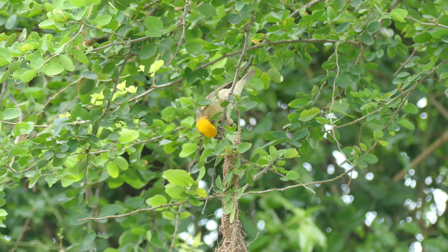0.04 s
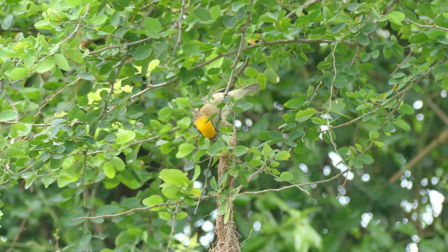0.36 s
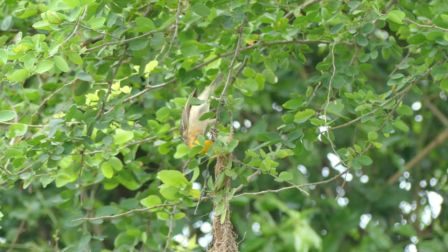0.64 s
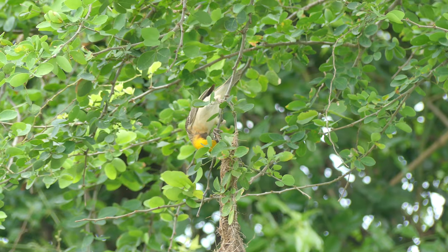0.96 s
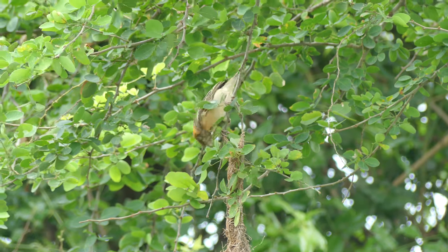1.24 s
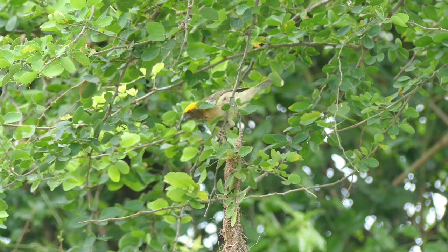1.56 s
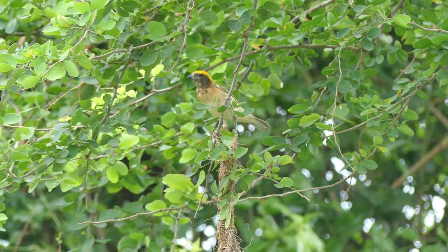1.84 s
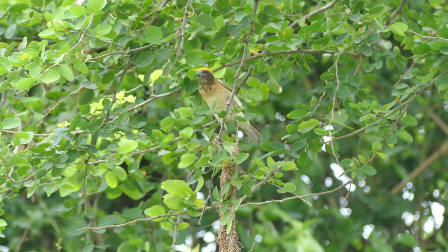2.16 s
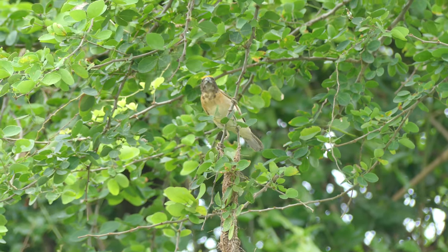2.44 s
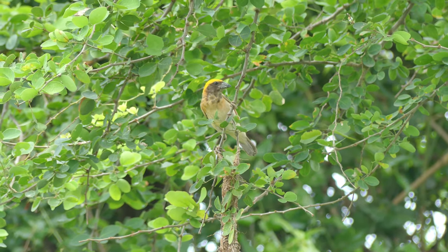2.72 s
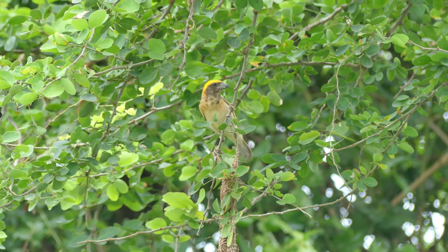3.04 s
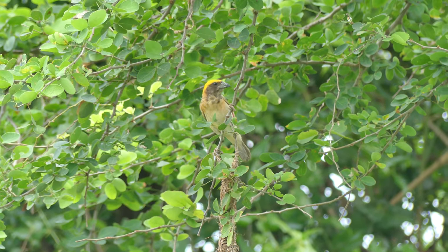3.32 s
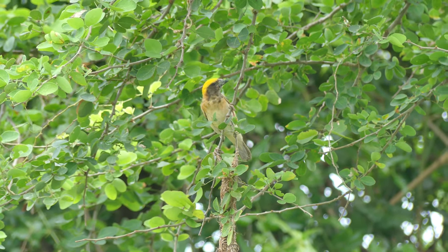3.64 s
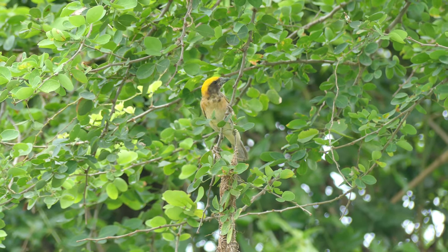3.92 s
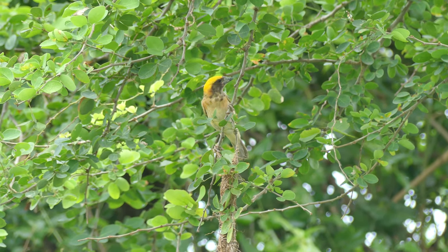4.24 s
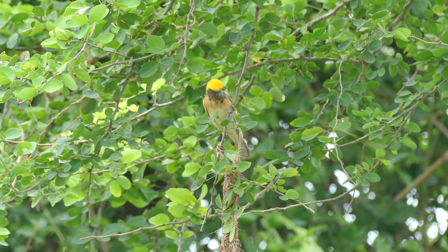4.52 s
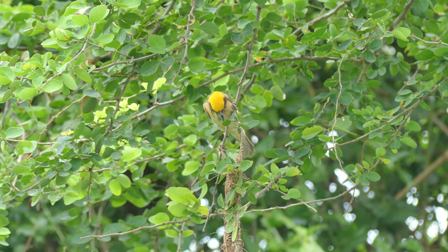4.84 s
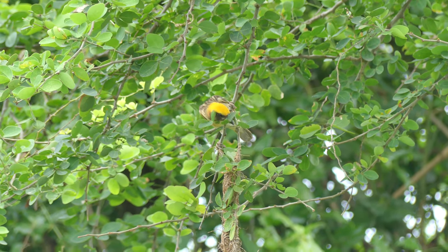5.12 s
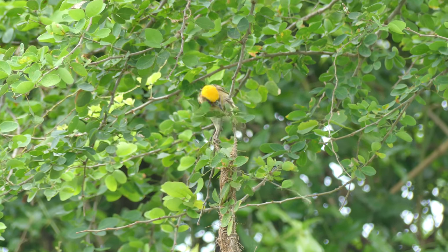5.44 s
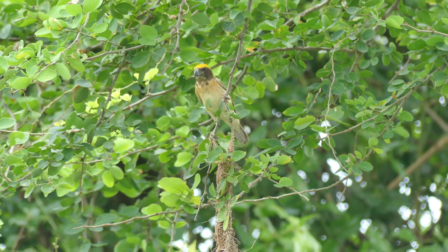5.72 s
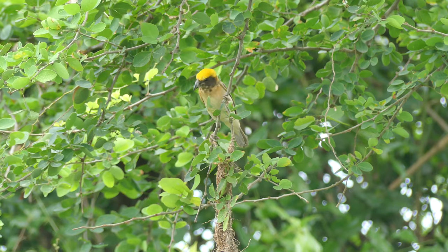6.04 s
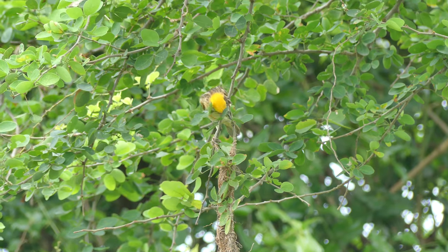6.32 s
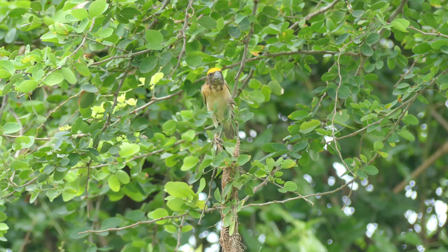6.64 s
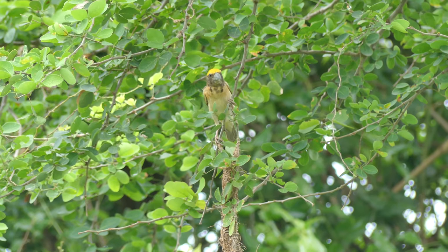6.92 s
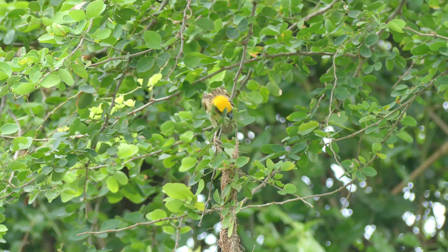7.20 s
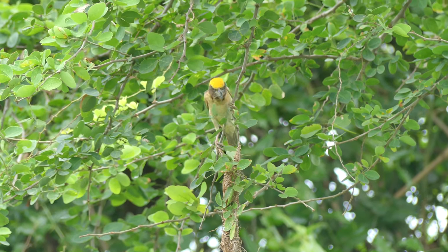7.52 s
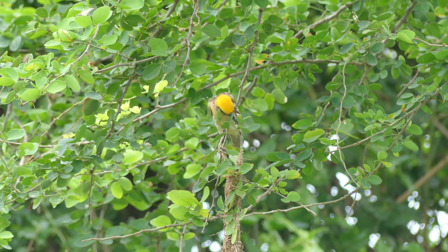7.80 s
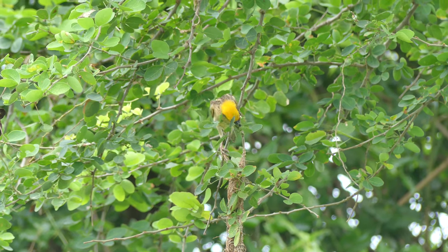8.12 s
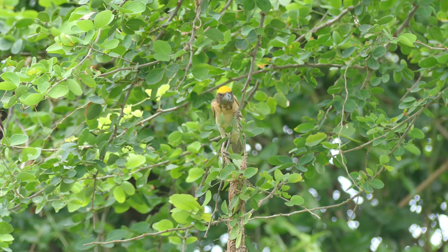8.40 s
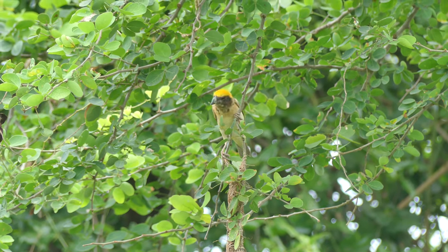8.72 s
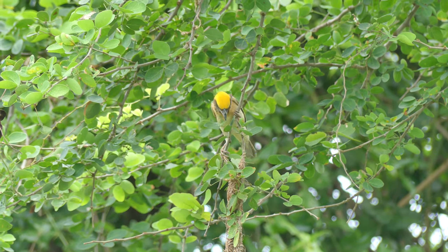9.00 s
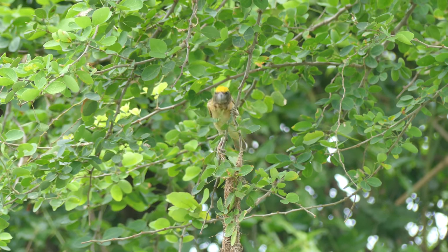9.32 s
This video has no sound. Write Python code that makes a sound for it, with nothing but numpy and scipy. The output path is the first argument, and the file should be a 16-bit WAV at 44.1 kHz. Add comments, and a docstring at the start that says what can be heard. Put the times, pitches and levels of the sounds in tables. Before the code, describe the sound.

A colony of small birds cheeps and chatters continuously in a leafy tree, with harsh buzzy rasps and a few dry opening snaps.

```python
"""A weaver colony in a leafy tree, a few metres from the microphone, over a faint outdoor rush.
Dry snaps of bill or twig come first; then near birds cheep, peep and slur throughout, whistling on both
sides of the syrinx. Harsh rasps run from 1.3 to 2.4 s and low churrs scold around 4 s, both rattled by
the syrinx membranes. Near 8 s begging buzzes come again from deeper in the tree. All the while branches
scatter every call, and more of the colony chatters further off."""
import sys
import numpy as np
from scipy import signal
from scipy.fft import rfft, irfft, next_fast_len
from scipy.io import wavfile
from scipy.ndimage import uniform_filter1d

SR = 44100
rng = np.random.default_rng(int(sys.argv[2]) if len(sys.argv) > 2 else 0)


def store_pcm(level_fs):
    """Save levels as 16-bit WAV."""
    pcm = np.round(np.clip(level_fs, -1, 1) * 32767).astype(np.int16)
    wavfile.write(sys.argv[1], SR, np.atleast_2d(pcm).T)


N = 412776
USUAL_HZ, UPPER_SIDE_HZ = 6685, 7697  # usual pitches of the two sides of the syrinx


def syrinx(length, db, top_hz, fall_hz, second_db, gesture,
           rise=0.075, fade=0.029, tremble_hz=45, interval=1.15, octave_db=-29):
    """One side of the syrinx whistles the gesture; the other joins higher and rougher, and they beat."""
    u = progress(length)
    n = len(u)
    drop = uniform_filter1d(np.interp(u, *np.transpose(gesture)), size=n // 16, mode="nearest")
    hz = top_hz - fall_hz * drop + 45 * waver(n, 56)
    first = phase(hz + tremble_hz * waver(n, 247))
    second = phase(np.minimum(hz * interval, 8100) + 120 * waver(n, 45) + 150 * waver(n, 550))
    mixing = amp(-14) * np.sin(2 * first - second) + amp(-31.5) * np.sin(first + second)
    tone = np.sin(first) + amp(octave_db) * np.sin(2 * first)
    tone += amp(second_db) * (np.sin(second) + mixing)
    # the harder the two sides couple, the more the tone frays, around itself and toward the octave
    fray = waver(n, 800) * np.sin(first) + amp(-14) * waver(n, 1500) * np.sin(1.75 * first)
    tone += amp(-12 + .7 * second_db) * fray
    push_db = -2.5 * drop + 1.4 * waver(n, 70)  # air pressure sinks with the pitch
    return amp(db + push_db) * np.sqrt(2) * tone * swell(u, rise, fade)


# Pitch gesture of a cheep: (time [share of note], drop [share of fall])
DOUBLE_HUMP = [(0, .45), (.1, .08), (.2, 0), (.3, .08), (.43, .4), (.53, .38), (.66, .18), (.77, .33),
               (.88, .68), (1, 1.05)]
# Loud cheeps on the nearest perches: (time [s], length [s], level [dB], top pitch [Hz])
CHEEPS = [(.548, .114, -27.8, 6720), (.881, .136, -27.6, 6540), (1.198, .133, -27.8, 6750),
          (1.665, .122, -28.5, 6750), (2.278, .141, -30.5, 6690), (3.011, .125, -27.1, 6660),
          (3.863, .133, -27.2, 6590), (4.198, .101, -28.7, 6580), (4.541, .096, -29.6, 6780),
          (5.116, .122, -30.6, 6720), (5.3, .11, -30, 6850), (5.965, .127, -27.5, 6780),
          (6.192, .125, -26.9, 6390), (7.05, .111, -28.2, 6750), (7.776, .135, -29.3, 6780),
          (8.051, .138, -30.2, 6720), (8.775, .13, -27.2, 6670), (9.003, .11, -28.2, 6400)]
def cheep(length, db, top_hz):
    """A full two-voiced call; the quicker or lower it is, the further it falls."""
    usual_s, hurry_hz_per_s = .124, 11770
    fall_hz = 1190 + hurry_hz_per_s * (usual_s - length) + (USUAL_HZ - top_hz) / 2
    return syrinx(length, db, top_hz, fall_hz, second_db=-10, gesture=DOUBLE_HUMP,
                  rise=0.19, fade=.14, tremble_hz=68, interval=UPPER_SIDE_HZ / top_hz, octave_db=-31.5)


# Pitch gesture of a peep: (time [share of note], drop [share of fall])
ARCH = [(0, .65), (.12, .15), (.26, 0), (.44, .1), (.62, 0), (.8, .3), (1, 1)]
# Peeps on the nearest perches: (time [s], length [s], level [dB], top pitch [Hz])
PEEPS = [(0.329, 0.11, -32.5, 6660), (0.845, .05, -36.5, 6730), (1.08, .11, -36.5, 6510),
         (1.398, 0.041, -36.5, 6810), (1.617, 0.044, -36.5, 6970), (2.059, .11, -33, 6600),
         (3.527, .11, -32.5, 6630), (3.736, 0.072, -33, 6766), (4.422, .11, -31.5, 6320),
         (5.091, 0.079, -33.5, 6770), (5.635, 0.14, -33, 6680), (5.821, 0.11, -35.5, 6760),
         (6.481, .101, -33, 6180), (6.587, 0.12, -33.5, 6660), (7.238, .12, -36.5, 6660),
         (7.325, 0.11, -33.5, 6636), (8.019, 0.025, -34, 6680), (8.339, 0.082, -34, 6860),
         (9.21, 0.12, -38.5, 6850)]
def peep(length, db, top_hz):
    """A clean arch that deepens and roughens when pressed low; the upper side keeps its own pitch."""
    pressed_hz = USUAL_HZ - top_hz
    fall_hz = 560 + pressed_hz
    second_db = -25.5 + 0.0367 * pressed_hz
    return syrinx(length, db, top_hz, fall_hz, second_db, ARCH, rise=0.14, fade=0.065,
                  tremble_hz=36.3, interval=UPPER_SIDE_HZ / top_hz, octave_db=-29.5)


# Pitch gesture of a slur: (time [share of note], drop [share of fall])
SLIDE = [(0, .06), (.14, 0), (.3, .22), (.47, .62), (.64, .92), (.8, 1), (1, 1)]
# Down-slurs at middle distance: (time [s], slide length [s], level [dB], top pitch [Hz])
SLURS = [(0.157, 0.037, -35.5, 6480), (2.677, 0.14, -38.5, 7900), (2.955, .06, -34.5, 6420),
         (3.255, .1, -38.5, 7310), (4.006, 0.13, -40, 7300), (4.312, 0.13, -33.5, 7310),
         (4.437, 0.13, -38, 7700), (4.662, 0.13, -40, 7750), (4.726, 0.052, -32, 6530),
         (4.917, 0.097, -37, 7240), (5.586, 0.042, -29.5, 6850), (5.935, 0.05, -35.5, 7390),
         (6.34, 0.046, -35, 6380), (6.925, 0.057, -35.5, 6510), (7.16, 0.063, -37, 7040),
         (7.737, 0.055, -36.5, 6530), (8.636, 0.099, -32, 7100)]
def slur(length, db, top_hz):
    """A downward slide that lingers at the bottom; the second voice is weaker in the high ones."""
    sink_hz_per_s, bottom_hz, linger_s = 15000, 5620, .024
    fall_hz = min(sink_hz_per_s * length, top_hz - bottom_hz)
    second_db = -13 - 0.0057 * (top_hz - 6380)
    return syrinx(length + linger_s, db, top_hz, fall_hz, second_db, SLIDE,
                  rise=0.29, fade=0.59, tremble_hz=79.5, interval=1.16, octave_db=-25)


# Response of the bill: (frequency [Hz], gain [dB])
BILL = [(8000, 1.5), (9000, 4.5), (11500, -3.5), (13300, 2.5), (14300, -13), (16000, -14)]
def bill(x):
    """The bill passes the octave of a whistled note and little above it."""
    return colour(x, BILL)


def rattle(n, rate_hz, jitter, breath):
    """Uneven snaps of the syrinx membranes, with air rushing through each opening."""
    turns = np.cumsum(rate_hz * np.exp(jitter * waver(n, 400))) / SR
    pulses = np.diff(np.floor(turns), prepend=0)
    puffs = np.exp(-3 * (turns % 1)) * rng.standard_normal(n)
    return unit(pulses) + breath * unit(puffs)


# Response of the throat in harsh calls: (frequency [Hz], gain [dB])
THROAT = [(1500, -49), (2700, -15), (3300, -3), (4000, 2.5), (4500, 0.5), (5500, 5), (6500, -9),
          (7800, -2.5), (10800, 2), (13000, -5), (16000, -38)]
def rasp(length, db, start_hz, end_hz):
    """Two lurching, falling voices and a rattle that follows them, coloured by the throat."""
    u = progress(length * 1.12)
    n = len(u)
    hz = start_hz + (end_hz - start_hz) * u + 280 * waver(n, 120)
    upper = phase(1.06 * hz + 280 * waver(n, 650))
    lower = phase(.85 * hz + 150 * waver(n, 400))
    overtones = amp(-16.5) * np.sin(upper + lower) + amp(-61) * np.sin(2 * upper)
    voices = unit(np.sin(upper) + amp(-5) * np.sin(lower) + overtones)
    drive = rattle(n, rate_hz=620, jitter=0.28, breath=0.35)
    grit = resonate(drive, hz, 1400) + amp(-10.5) * resonate(drive, 2 * hz, 3800)
    mix = voices * amp(2.5 * waver(n, 300)) + amp(-7) * grit
    mix += amp(-6.5) * resonate(mix, np.full(n, 4050), 410)  # the windpipe rings at its own pitch
    return amp(db) * unit(colour(mix, THROAT)) * swell(u, rise=0.15, fade=0.38)


# Single rasps near the microphone: (time [s], nominal length [s], level [dB])
RASPS = [(.42, 0.093, -35.5), (0.78, 0.067, -46), (3.547, .078, -42), (4.843, 0.069, -32.5),
         (4.959, 0.077, -36.5), (5.212, 0.072, -32), (5.534, .051, -41), (5.63, .067, -30),
         (5.954, 0.073, -37), (6.448, 0.1, -33), (9.014, 0.093, -32)]
# Runs of rasps: (first note [s], last note [s], first level [dB], last level [dB])
RASP_RUNS = [(1.321, 1.389, -40, -34), (1.526, 2.127, -33, -29), (2.227, 2.433, -27, -35),
             (9.149, 9.314, -32.5, -32)]
def rasps():
    """Single harsh notes, the louder ending lower, and even runs, the louder notes starting higher."""
    loud_db, notes_per_s = -32, 12.6
    rows = [(s, length, db, 5644, 3700 + 119.5 * (loud_db - db)) for s, length, db in RASPS]
    for first, last, first_db, last_db in RASP_RUNS:
        count = round((last - first) * notes_per_s) + 1
        notes = np.linspace((first, first_db), (last, last_db), count)
        rows += [(s, .094, db, 5220 + 60 * (db - loud_db), 3570) for s, db in notes]
    return play(rows, rasp)


# Scolding churrs near the microphone: (time [s], level [dB], low resonance [Hz])
CHURRS = [(.345, -43.5, 2110), (3.66, -39, 2130), (3.8, -36.5, 2150), (3.937, -35.5, 2160),
          (4.11, -38, 1960), (4.27, -50, 2370), (4.41, -50, 2240), (4.5, -53, 2430), (6.15, -54, 2000),
          (6.509, -44, 2200), (8.08, -53, 2180), (8.51, -51, 2110)]
def churr(db, hz):
    """A slower rattle through a low resonance, its octave and a hiss, sagging as the bill closes."""
    u = progress(.0858)
    sag_hz = hz * (1.04 - 0.22 * u ** 3) + 90 * waver(len(u), 200)
    drive = rattle(len(u), rate_hz=300, jitter=.25, breath=1.0)
    low = resonate(drive, sag_hz, 440)
    low = unit(colour(low, [(900, -15.5), (1700, -11.5), (2700, -1.5), (4000, 11.5)]))
    high = resonate(drive, sag_hz * 1.984, 490) + amp(-5) * resonate(drive, sag_hz * 2.43, 1500)
    high = unit(colour(high, THROAT))
    high_db = 5 + 0.28 * (-36.5 - db)  # softer churrs are thinner
    return amp(db) * (low + amp(high_db) * high) * swell(u, rise=0.33, fade=0.54)


# Soft low whistles in the tree: (time [s], length [s], level [dB], start pitch [Hz], end pitch [Hz])
WHISTLES = [(.62, 0.29, -59, 3450, 3420), (2.72, .048, -40.5, 4590, 3500), (3.12, 0.073, -55, 4260, 3030),
            (4.2, 0.053, -45, 3160, 3380), (4.65, 0.059, -54, 3800, 3740), (4.76, 0.24, -52, 3500, 3450),
            (5.1, 0.057, -59, 2890, 3400), (5.35, 0.071, -59, 3110, 2700), (5.78, 0.063, -48.5, 3850, 3440),
            (6.27, 0.073, -47, 3940, 3570), (6.33, .12, -47, 3616, 4014), (7.36, 0.017, -51.5, 3850, 2400),
            (7.725, 0.018, -48.5, 3400, 2280), (7.94, .018, -49, 3150, 2010),
            (8.668, 0.051, -35, 2416, 3290)]
def whistle(length, db, start_hz, end_hz):
    """A plain glide with a slight tremble."""
    u = progress(length)
    hz = start_hz + (end_hz - start_hz) * u + 60 * waver(len(u), 350)
    return amp(db) * unit(np.sin(phase(hz))) * swell(u, rise=0.22, fade=0.3)


# Modes of a snap: (frequency [multiple of ring pitch], level [dB], decay by 60 dB [s])
SNAP_MODES = [(.74, -2.5, 0.0097), (1.03, 3.5, 0.0066), (1.35, 2.5, 0.0019), (1.85, -10, 0.0041)]
def snap(db, hz):
    """Bill or twig rings for a few stiff, quickly damped cycles."""
    t = np.arange(SR // 50) / SR
    ring = sum(amp(level - 60 * t / t60) * np.sin(2 * np.pi * hz * k * t)
               for k, level, t60 in SNAP_MODES)
    ring = signal.sosfilt(signal.butter(4, 1300, "high", fs=SR, output="sos"), ring)
    return amp(db) * ring / abs(ring).max()


# Dry snaps close by: (time [s], level [dB])
SNAPS = [(.0045, -14), (.0098, -12.5), (.033, -18), (0.0397, -21), (.049, -5.5), (0.0622, -16),
         (.0755, -14), (0.0894, -19), (.109, -15.5), (0.1246, -15), (0.1396, -17)]
# Their colour at the microphone: (frequency [Hz], gain [dB])
SNAP_COLOUR = [(700, -45), (1100, -14), (1500, -3), (4200, 0.5), (6500, -15), (10000, 0.5), (15000, -42)]
def snaps():
    """A quick flurry of snaps among the leaves, none ringing quite like the last."""
    rings_hz = 2280 * (1 + 0.15 * rng.uniform(-1.56, 1, len(SNAPS)))
    flurry = play([(s, db, hz) for (s, db), hz in zip(SNAPS, rings_hz)], snap)
    return colour(foliage(flurry, early_db=-6.5, tail_db=-7, t60=0.28), SNAP_COLOUR)


# Begging buzzes deeper in the tree: (time [s], length [s], level [dB])
BUZZES = [(1.1, 0.18, -43.5), (3.97, 0.34, -41), (7.84, 0.36, -44.5), (8.14, .38, -41)]
def buzz(length, db):
    """A long rattle held on one narrow resonance."""
    u = progress(length)
    n = len(u)
    drive = rattle(n, rate_hz=540, jitter=0.23, breath=0.29) * amp(7.1 * waver(n, 36))
    ring = resonate(drive, 4175 + 70 * waver(n, 30), width_hz=630)
    return amp(db) * ring * swell(u, rise=0.091, fade=0.063)


def far_chirps(level_db, count):
    """Birds deeper in the tree whistle arched notes at random."""
    rows = [(when * N / SR, 0.065 + 0.096 * span, level_db + 8 * loud,
             6500 + 1200 * pitch ** 2, 500 + 900 * fall)
            for when, span, loud, pitch, fall in rng.random((count, 5))]
    return bill(play(rows, syrinx, second_db=-12, gesture=ARCH))


def far_rasps(level_db, count):
    """Short harsh notes from deeper in the tree."""
    rows = [(when * N / SR, 0.044 + .05 * span, level_db + 8 * loud, 4100 + 700 * pitch, 4000)
            for when, span, loud, pitch in rng.random((count, 4))]
    return play(rows, rasp)


# Faint calls from another tree: (time [s], start pitch [Hz])
FAR_CALLS = [(2.208, 1207), (2.25, 1540), (2.481, 1435), (2.55, 1532), (2.65, 1600)]
def far_calls(length, level_db, rise_hz):
    """One distant bird repeats a short rising whistle."""
    return play([(s, length, level_db, hz, hz + rise_hz) for s, hz in FAR_CALLS], whistle)


def far_whistles(level_db, count):
    """Faint low glides from birds in other trees."""
    rows = []
    for when, span, loud, pitch, glide in rng.random((count, 5)):
        start_hz = 1600 + 2000 * pitch
        end_hz = start_hz * (.78 + .35 * glide)
        rows.append((when * N / SR, 0.0314 + .07 * span, level_db + 10 * loud, start_hz, end_hz))
    return play(rows, whistle)


# Rise and fall of the far colony: (time [s], level [dB])
COLONY_LEVEL = [(0, -37), (.7, -41.5), (1.3, -41.5), (2.3, -39.5), (2.6, -44.5), (3.41, -48.5), (4.07, -38),
                (4.6, -45), (6.33, -45), (7.45, -48.5), (8.29, -39.5), (9.36, -43.5)]
# Its colour at the microphone: (frequency [Hz], gain [dB])
COLONY_COLOUR = [(300, -38), (1000, -18), (1600, -18.5), (2300, -10.5), (3200, -18.5), (3700, -15),
                 (4100, 0.5), (4700, -5.5), (5600, 2.5), (6600, 3), (7600, -4.5), (8800, -19.5),
                 (11000, -27), (15000, -38.5)]
def far_chatter(gain_db, flutter_db):
    """Many distant calls merge into a fluttering, patchy hiss."""
    effort_db = np.interp(np.arange(N) / SR, *np.transpose(COLONY_LEVEL)) + flutter_db * waver(N, 23.3)
    hiss = patchy(colour(rng.standard_normal(N), COLONY_COLOUR), depth_db=4.5)
    return amp(gain_db + effort_db) * unit(hiss)


def echoes(x, early_db, tail_db, t60, scatter_s=0.016):
    """Single echoes off near branches, then a diffuse tail from the trees around."""
    t = np.arange(SR) / SR
    early = rng.standard_normal(SR) * (rng.random(SR) < 900 / SR)  # about 900 echoes a second
    early *= np.exp(-t / scatter_s) * (t > .002)
    tail = rng.standard_normal(SR) * amp(-60 * t / t60) * (1 - np.exp(-t / 0.015))
    echo = amp(early_db) * early / np.linalg.norm(early) + amp(tail_db) * tail / np.linalg.norm(tail)
    return signal.oaconvolve(x, echo)[:N]


def foliage(x, early_db, tail_db, t60):
    """Birds call from changing perches, so two sets of echo paths take turns."""
    turn = np.pi * np.arange(N) / SR
    return x + sum(echoes(x * share, early_db, tail_db, t60) for share in (np.sin(turn), np.cos(turn)))


# Scattered sound that differs between the channels: (frequency [Hz], gain [dB])
SPREAD = [(2000, -26), (6800, -37), (8200, -26), (12000, -11.5)]
# Balance of the calls at the microphone: (frequency [Hz], left minus right [dB])
BALANCE = [(7000, 0), (8000, -1.5), (11000, -3.5), (14000, -5)]
def stereo_microphone(birds):
    """Scattered sound reaches the two channels differently; the high treble leans right."""
    side = colour(echoes(birds, early_db=5, tail_db=-15, t60=1.0), SPREAD)
    left = colour(birds + side, [(hz, db / 2) for hz, db in BALANCE])
    right = colour(birds - side, [(hz, -db / 2) for hz, db in BALANCE])
    return np.array([left, right])


# Open air around the tree: (frequency [Hz], gain [dB])
AIR_COLOUR = [(25, -33), (60, -24), (80, -19), (125, -10.5), (220, -18.5), (295, -25), (365, 0.5),
              (440, 2.5), (540, -4), (640, -18), (800, -4), (950, -3), (1100, -11.5), (1300, -8.5),
              (2000, -30.5), (3200, -18.5), (9000, -6.5), (13000, -15.5), (15500, -20)]
# Likeness of its two channels: (frequency [Hz], coherence [0 to 1])
AIR_COHERENCE = [(100, 0.91), (1000, 0.98), (4000, 1), (8000, 0.57), (13000, 0.7)]
def air(level_db):
    """Gently shifting outdoor rush, nearly mono below the high treble."""
    common, separate = rfft(rng.standard_normal((2, N)))
    same = np.clip(read(AIR_COHERENCE, np.fft.rfftfreq(N, 1 / SR)), 0, 1)
    pair = irfft(np.array([common, same * common + np.sqrt(1 - same ** 2) * separate]), N)
    return amp(level_db) * unit(colour(patchy(pair, depth_db=2.5), AIR_COLOUR))


def patchy(x, depth_db):
    """Overlapping sources make small patches of time and pitch come and go."""
    spectra = signal.stft(x, nperseg=512, noverlap=384)[2]
    field = rng.standard_normal(spectra.shape[-2:])
    for _ in range(2):
        field = uniform_filter1d(uniform_filter1d(field, size=4, axis=0), size=16, axis=1)
    return signal.istft(spectra * amp(depth_db * unit(field)), nperseg=512, noverlap=384)[1][..., :N]


def amp(db):
    """Turns decibels into amplitude."""
    return 10 ** (np.asarray(db) / 20)


def unit(x):
    """Scales to rms 1."""
    return x / np.sqrt(np.mean(x ** 2) + 1e-20)


def read(points, hz):
    """Reads a spectrum table on a log-frequency axis."""
    f, value = np.transpose(points)
    return np.interp(np.log(hz + 1), np.log(f), value)


def colour(x, points):
    """Filters by a table of (frequency [Hz], gain [dB])."""
    n = x.shape[-1]
    return irfft(rfft(x) * amp(read(points, np.fft.rfftfreq(n, 1 / SR))), n)


def waver(n, rate_hz):
    """Smooth random drift of rms about 1, up to the given rate."""
    size = next_fast_len(n + 4096)
    lowpass = np.exp(-(np.fft.rfftfreq(size, 1 / SR) / rate_hz) ** 2)
    return unit(irfft(rfft(rng.standard_normal(size)) * lowpass, size))[:n]


def phase(hz):
    """Running phase of a pitch curve."""
    return 2 * np.pi * np.cumsum(hz) / SR


def resonate(x, hz, width_hz):
    """A steep resonance that follows the curve hz."""
    turn = np.exp(1j * phase(hz))
    pole = np.exp(-np.pi * width_hz / SR)
    return unit((turn * signal.lfilter([1], [1, -2 * pole, pole * pole], x / turn)).real)


def progress(length):
    """Runs from 0 to 1 over a note."""
    return np.linspace(0, 1, max(int(length * SR), 256))


def swell(u, rise, fade):
    """Loudness of one note: a soft rise and a soft fade, as shares of its length."""
    opening = np.sin(np.pi / 2 * np.clip(u / rise, 0, 1))
    closing = np.sin(np.pi / 2 * np.clip((1 - u) / fade, 0, 1))
    return unit(opening * closing)


def play(rows, voice, **settings):
    """Sounds every row of a table with one voice, at the time in its first column."""
    mix = np.zeros(N)
    for s, *row in rows:
        sound = voice(*row, **settings)
        part = mix[round(s * SR):][:len(sound)]
        part += sound[:len(part)]
    return mix


def scene():
    """Near, middle and far birds, more echo with distance from the microphone, in the open air."""
    near = bill(amp(-2.5) * play(CHEEPS, cheep) + amp(-1) * play(PEEPS, peep))
    middle = bill(amp(-2.5) * play(SLURS, slur))
    harsh = amp(-0.5) * rasps() + amp(-3) * play(CHURRS, churr)
    far = far_chirps(level_db=-55, count=60) + far_rasps(level_db=-56, count=24)
    far += far_calls(length=.05, level_db=-57, rise_hz=170) + far_whistles(level_db=-66.5, count=40)
    far += amp(1) * play(BUZZES, buzz)
    birds = foliage(near, early_db=-4, tail_db=-5, t60=0.24)
    birds += foliage(middle, early_db=0, tail_db=-6, t60=0.35)
    birds += amp(-2) * foliage(play(WHISTLES, whistle), early_db=-1.5, tail_db=-5, t60=0.42)
    birds += foliage(harsh, early_db=-4, tail_db=-9, t60=0.32)
    birds += echoes(far, early_db=0, tail_db=-6.5, t60=0.73) + far_chatter(gain_db=-1, flutter_db=3)
    birds += snaps()
    return stereo_microphone(birds) + air(level_db=-56.5)


def record(dry):
    """The recorder's band limit, a steep cut at 15.7 kHz."""
    lowpass = signal.firwin(511, 15700, window=("kaiser", 9), fs=SR)
    return signal.oaconvolve(dry, lowpass[None], "same")


dry = scene()
out = record(dry)
store_pcm(out)
```